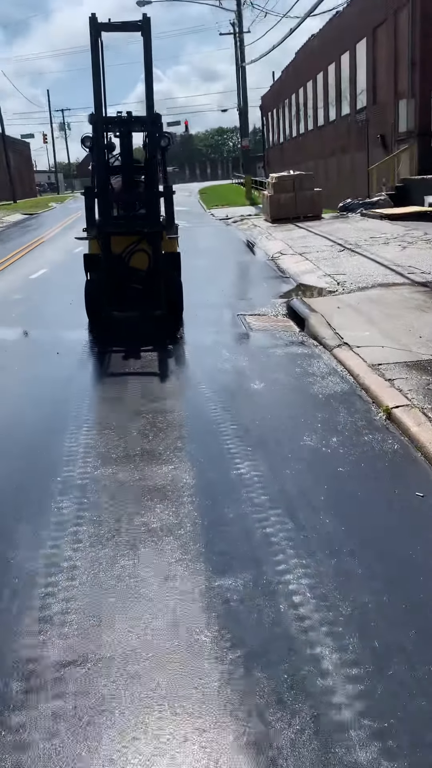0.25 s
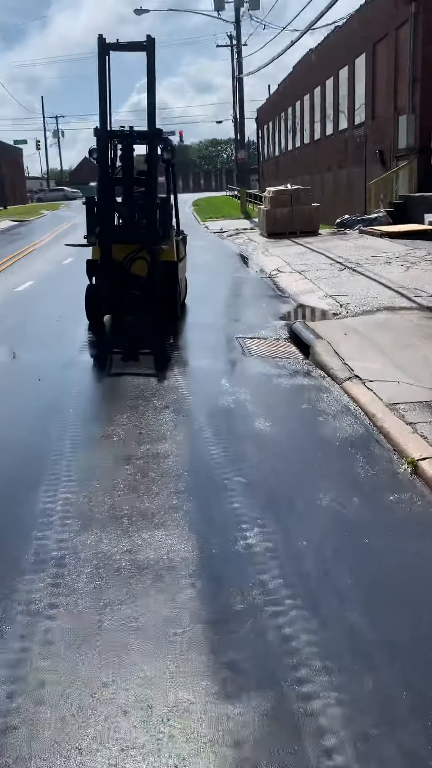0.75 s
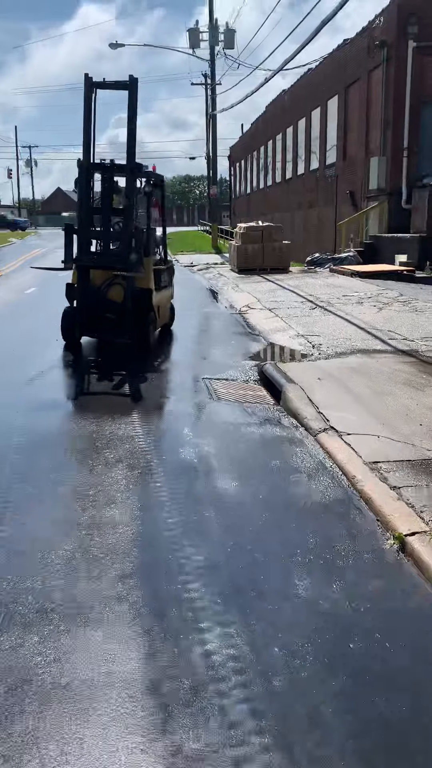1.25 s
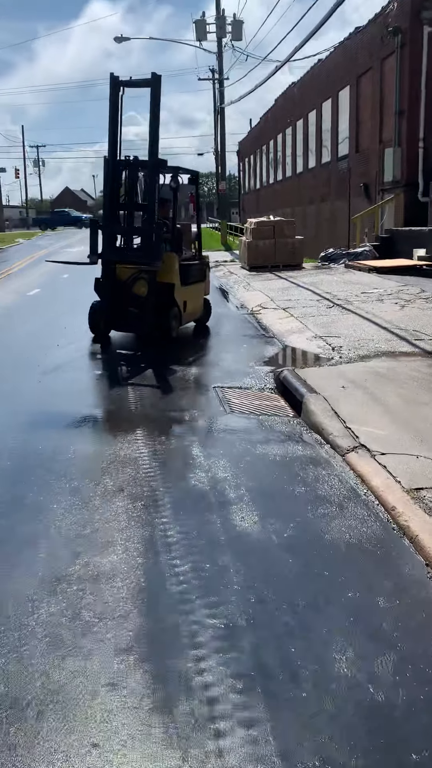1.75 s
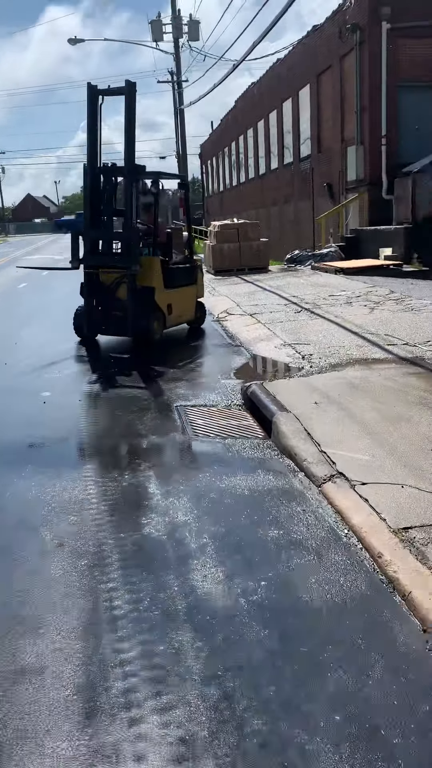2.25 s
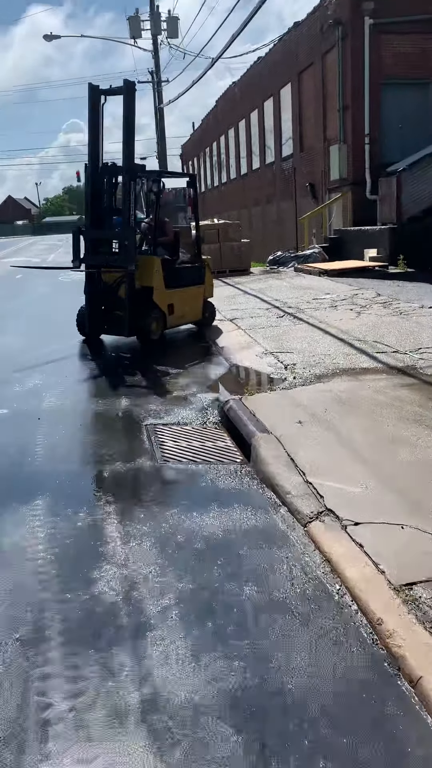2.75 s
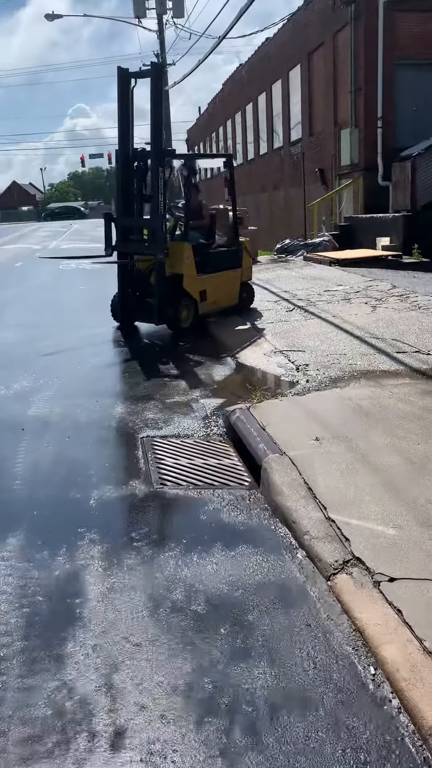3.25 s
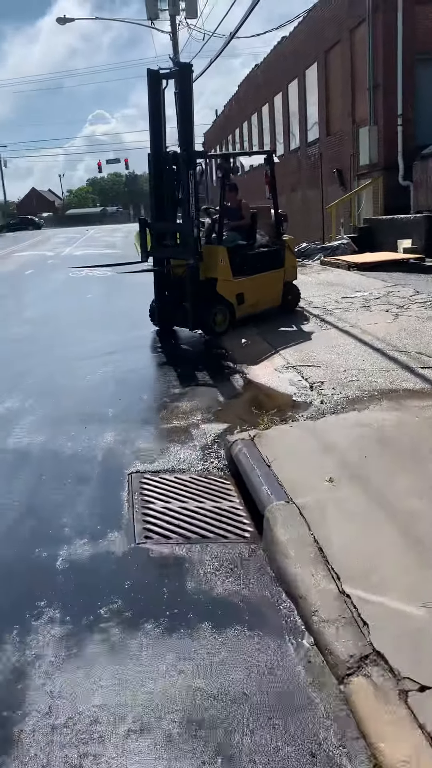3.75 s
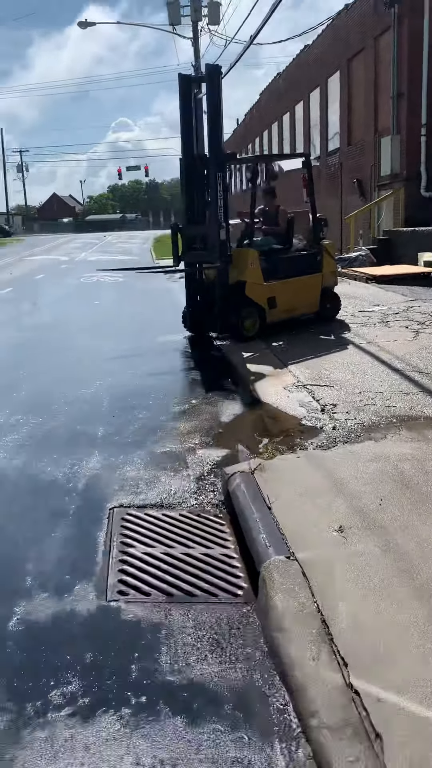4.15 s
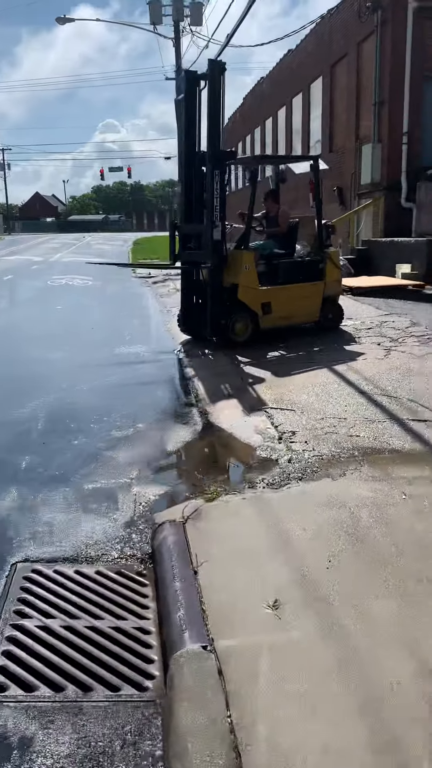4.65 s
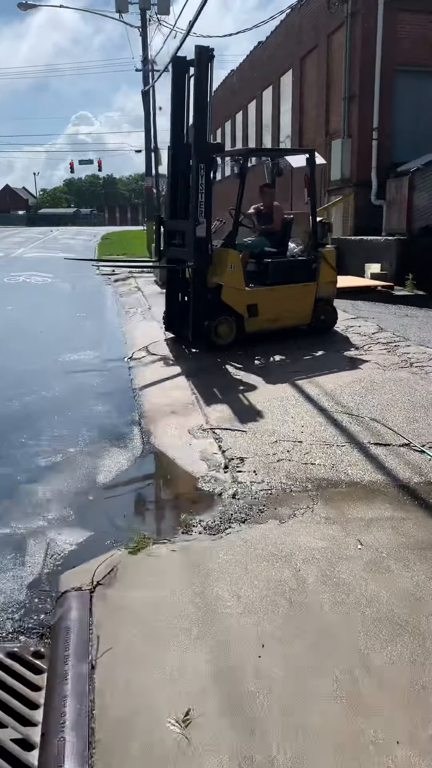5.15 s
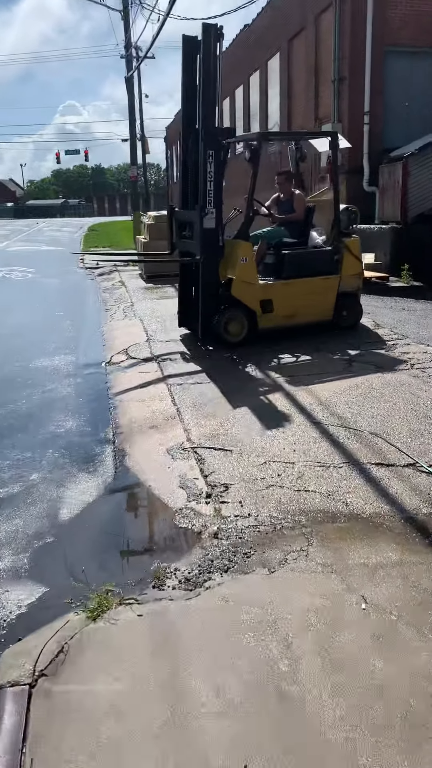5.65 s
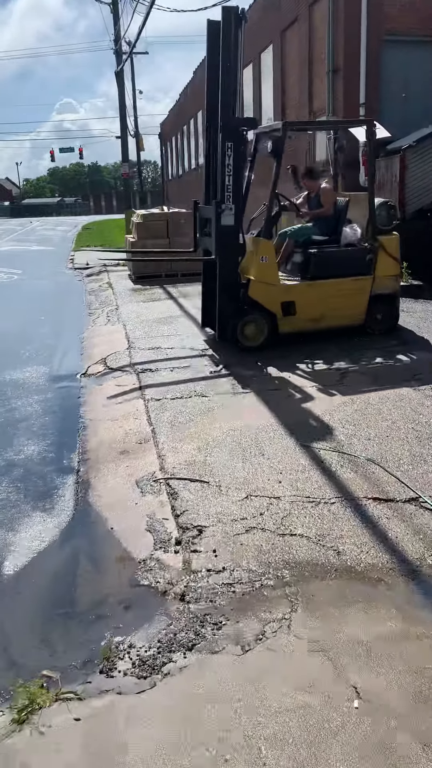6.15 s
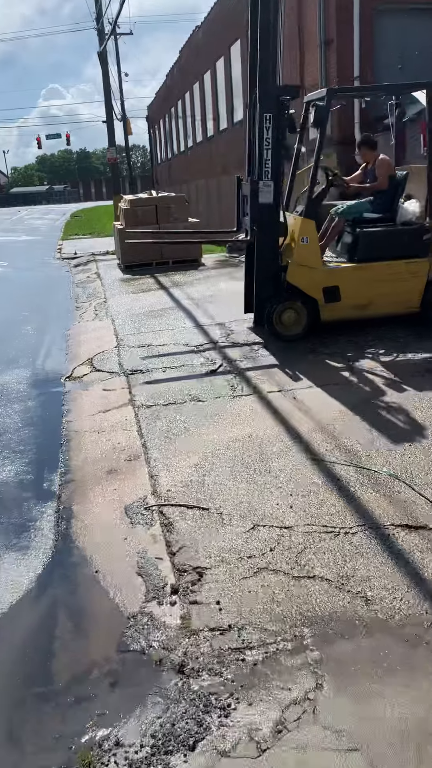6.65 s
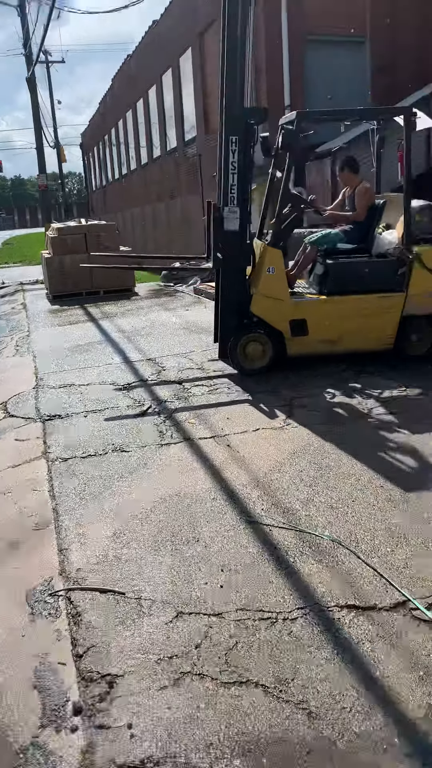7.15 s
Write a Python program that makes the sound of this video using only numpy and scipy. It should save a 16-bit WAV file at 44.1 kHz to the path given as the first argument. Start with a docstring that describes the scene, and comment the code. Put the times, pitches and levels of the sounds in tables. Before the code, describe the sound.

A forklift's engine chugs low and uneven outdoors, its pitch dropping as it slows with a falling gear whine and wet tyre swishes. Mast rails chatter. Crossing onto cracked concrete, the forks clank and crunch while the engine revs, dips and revs again; the loudest knock comes late, before a closing metallic squeal. A handheld stereo microphone hears a short echo from the yard.

```python
"""A propane forklift engine lopes at idle and chugs unevenly under throttle too: puffs and tones ring its pipe.
The truck turns off a wet street onto cracked concrete; shaped noise makes its hiss and running gear.
Gear tones whine lower as it slows, and tyres swish with noise and bursting grains.
The mast chatters and squeaks with wavering tones; the forks clank with ringing steel, thuds and crunches."""
import sys
import numpy as np
from scipy import signal
from scipy.fft import rfft, irfft, next_fast_len
from scipy.io import wavfile
from scipy.ndimage import uniform_filter1d, map_coordinates

SR = 44100
rng = np.random.default_rng(int(sys.argv[2]) if len(sys.argv) > 2 else 0)


def transcribe(u):
    """Save the signal u as a 16-bit wav file named by the first command-line argument.

    u: samples, shape (n,) or (channels, n), limited to [-1, 1]; the rate is SR.
    q: integer samples, one column per channel.
    """
    v = np.clip(np.atleast_2d(u).T, -1, 1)
    q = np.round(v * 32767).astype(np.int16)
    wavfile.write(sys.argv[1], SR, q)


N = 326340
T = np.arange(N) / SR
# Levels in the tables are relative: later gains and filters shift them.


def amp(db):
    """Turn decibels into a gain."""
    return 10 ** (np.asarray(db) / 20)


def unit(x):
    """Scale to an rms (average strength) of 1."""
    return x / np.sqrt(np.mean(x ** 2) + 1e-20)


def steady(x):
    """Even out the loudness by dividing by a running rms."""
    window = SR // 7
    power = uniform_filter1d(uniform_filter1d(x ** 2, size=window), size=window)
    return x / np.sqrt(np.abs(power) + 1e-20)


def along(points, hz):
    """Read a curve of (frequency [Hz], value) points on a log frequency axis."""
    f, v = np.transpose(points)
    return np.interp(np.log(hz + 1), np.log(f + 1), v)


def curves(rows):
    """Draw each column after the time as a curve with one value per sample."""
    s, *cols = np.transpose(rows)
    return [np.interp(T, s, c) for c in cols]


def wobble(rate):
    """A smooth random curve with rate knots a second."""
    knots = rng.standard_normal(int(N * rate / SR) + 4)
    return map_coordinates(knots, [T * rate])


def wavering(hz, share, rate):
    """Phase of a tone whose pitch wavers by a share of itself, with rate knots a second."""
    return 2 * np.pi * np.cumsum(hz * (1 + share * wobble(rate))) / SR


def filtered(x, response):
    """Multiply the spectrum of x by a response to frequency."""
    m = next_fast_len(N + SR // 2)
    return irfft(rfft(x, m) * response(np.fft.rfftfreq(m, 1 / SR)), m)[..., :N]


def noise(spectrum):
    """Coloured noise of rms 1."""
    return unit(filtered(rng.standard_normal(N), lambda hz: amp(along(spectrum, hz))))


def causal(spectrum, size=8192):
    """Turn a spectrum into a minimum-phase impulse response, which answers as early as it can."""
    log_gain = np.log(amp(along(spectrum, np.fft.rfftfreq(size, 1 / SR))))
    cepstrum = irfft(log_gain)
    cepstrum[1:size // 2] *= 2
    cepstrum[size // 2 + 1:] = 0
    return irfft(np.exp(rfft(cepstrum)))


def add(track, s, sound):
    """Mix a sound in at time s."""
    start = max(round(s * SR), 0)
    track[start:start + len(sound)] += sound[:N - start]


def ring(modes, t, detune):
    """Steel rings at several fading pitches, struck a little differently each time."""
    total = 0
    for hz, db, t60 in modes:
        gain = amp(db + rng.normal(0, 2) - 60 * t / t60)
        pitch = hz * (1 + detune * rng.normal())
        total = total + gain * np.sin(2 * np.pi * (pitch * t + rng.random()))
    return total


# engine speed: (time [s], firing rate [firings per second])
ENGINE_SPEED = [(0.0, 43.68), (0.25, 43.09), (0.75, 36.5), (1.3, 33.38), (2.0, 31.77), (3.3, 30.95),
                (3.7, 33.12), (4.05, 37.52), (4.5, 39.37), (4.85, 37.83), (5.15, 30.54), (5.35, 30.66),
                (5.62, 32.63), (6.05, 41.88), (6.3, 43.6), (6.6, 33.01), (6.95, 28.93), (7.4, 27.27)]


def firing_rate():
    """How often a cylinder fires, as the engine speeds up and slows down."""
    return curves(ENGINE_SPEED)[0]


def firings(turns):
    """The samples at which a cylinder fires: each time the firing count passes a whole number."""
    return np.flatnonzero(np.diff(np.floor(turns)) > 0)


# the driver's foot: (time [s], exhaust level [dB], throttle [0-1])
DRIVER_FOOT = [(0, -27, 0.69), (.4, -28.5, 0.7), (.9, -34.5, 0.57), (1.4, -31.5, 0.27), (3, -31, 0.2),
               (3.8, -30.5, 0.61), (4.5, -28.5, 0.63), (5.1, -33, 0.53), (5.4, -30, 0.55),
               (5.72, -27.5, 0.75), (6.35, -32, 0.97), (6.62, -34.5, 0.6), (6.76, -28, 0.29),
               (7.4, -31, 0.81)]
# firing orders 1 to 6: (level with throttle shut [dB], level with it open [dB])
ORDER_LEVELS = [(-11, 4), (-24.5, 3.5), (-16, 13), (6, 6), (11, -6.5), (-1, -6.5)]
# the silencer's peaks and dips, which the orders sweep through: (frequency [Hz], level [dB])
SILENCER_RESPONSE = [(28, -17), (33, -7), (42, -0.5), (60, 8.5), (70, 7), (78, -5.5), (90, 1.5), (115, 0.5),
                     (135, -7), (165, -10), (205, 4), (280, -3.5)]
# how the pipe colours the puffs: (frequency [Hz], level [dB])
PIPE_RESPONSE = [(25, -40), (55, 0.5), (90, -5), (130, 2.5), (180, 1), (240, -2.5), (310, -11.5),
                 (450, -21), (1200, -70)]
# flow noise in the pipe: (level with throttle shut [dB], level with it open [dB])
FLOW_NOISE = (-34, -31)
# open throttle advances the orders: (even orders [radians], odd orders [radians])
LOAD_LEAD = (1.7, 3.4)
# two rows, throttle shut then open: (puff of each of four cylinders less the average [relative size])
CYLINDER_PUFFS = [(-.25, .6, -.9, .55), (0, .6, -.95, .35)]
# loudness of the uneven puffs: (time [s], level [dB])
LOPE_LEVEL = [(.25, -30.5), (.55, -39), (1, -36), (1.4, -32), (3.7, -30), (5.1, -33), (6.15, -28),
              (6.55, -33), (6.75, -30)]
BARK_DB = -12  # orders above the sixth, against the third
CRANK_JITTER, ORDER_DRIFT_DB = .008, 1.3  # in firing intervals; slow swell of each order
PUFF_SCATTER = .19  # random part of each puff, relative size
DULL_HZ, DULL_FROM_S, DULL_TO_S = 190, 5.8, 6.9  # the puffs lose their top as the tailpipe turns away


def exhaust(rate, turns):
    """Puffs ring the pipe: even firing gives the orders, unequal cylinders the lope; throttle sets their mix."""
    level_db, throttle = curves(DRIVER_FOOT)
    by_throttle = lambda shut, wide: shut + (wide - shut) * np.clip(throttle, 0, 1)
    response = causal(PIPE_RESPONSE)
    lag = np.unwrap(np.angle(rfft(response)))
    grid = np.fft.rfftfreq(len(response), 1 / SR)

    order_db = []
    for k, (shut_db, wide_db) in enumerate(ORDER_LEVELS, 1):
        order_db.append(level_db + by_throttle(shut_db, wide_db) + along(SILENCER_RESPONSE, k * rate))
    # load, which drives the third order, also brings out a bark above the sixth
    order_db += [order_db[2] + BARK_DB + 0.58 * along(PIPE_RESPONSE, k * rate) for k in range(7, 11)]

    turns = turns + CRANK_JITTER * wobble(25)  # the crank runs a little unevenly
    tone = np.zeros(N)
    for k, db in enumerate(order_db, 1):
        pipe_lag = np.interp(k * rate, grid, lag)
        phase = 2 * np.pi * k * turns + pipe_lag + throttle * LOAD_LEAD[k % 2]
        tone += amp(db + ORDER_DRIFT_DB * wobble(1.996)) * np.sqrt(2) * np.cos(phase)

    at = firings(turns)
    shut, wide = (np.resize(sizes, len(at)) for sizes in CYLINDER_PUFFS)
    openness = np.clip(2 * throttle[at], 0, 1)
    puffs = np.zeros(N)
    puffs[at] = shut + (wide - shut) * openness + PUFF_SCATTER * rng.standard_normal(len(at))
    # coasting leaves the puffs distinct; under throttle more turbulent flow joins them
    puffs += amp(by_throttle(*FLOW_NOISE)) * rng.standard_normal(N)

    bright = signal.fftconvolve(puffs, response)[:N]
    dull = filtered(bright, lambda hz: 1 / (1 + (hz / DULL_HZ) ** 4))
    turned_away = np.interp(T, [DULL_FROM_S, DULL_TO_S], [0, 1])
    lope_db, = curves(LOPE_LEVEL)
    lope = amp(lope_db) * steady(bright + turned_away * (dull - bright))
    return -(tone + lope)


def rattle(gear_db):
    """Loose rails ring under random taps, harder as the truck shakes."""
    taps = (rng.random(N) < 260 / SR) * rng.standard_normal(N)  # about 260 a second
    rails = [(1072, 81, 6.0), (1470, 350, -1.0)]  # (pitch [Hz], width before squaring [Hz], level [dB])

    def resonance(f):
        return sum(amp(db) * (1j * f * w / (c * c - f * f + 1j * f * w)) ** 2 for c, w, db in rails)

    shaking_db = gear_db - 14.0 + 0.29 * (gear_db - gear_db.mean())
    return unit(filtered(taps, resonance)) * amp(shaking_db)


def grit(centre_hz, t60_s, count=3000, scatter_db=3.0):
    """Grains burst under the tyres as short fading tones, each with its own pitch and size."""
    start = rng.integers(0, N, (count, 1))
    pitch, size = rng.standard_normal((2, count, 1))
    t = T[:SR // 50]  # every grain is cut off after 20 ms
    gain = amp(scatter_db * np.minimum(size, 2) - 60 * t / t60_s)
    grains = gain * np.sin(2 * np.pi * centre_hz * np.exp(.35 * pitch) * t)
    places = start + np.arange(len(t))
    return unit(np.bincount(places.ravel(), grains.ravel(), N)[:N])


# rolling noise as the ground changes and the truck nears: (time [s], running gear level [dB], hiss level [dB])
ROLLING_NOISE = [(0, -35, -41.5), (2.85, -36.5, -49), (3.35, -31, -45.5), (4, -34.5, -39),
                 (5.55, -34.5, -42), (5.85, -31, -34), (6.6, -32.5, -40), (6.9, -33.5, -48.5),
                 (7.4, -34.5, -49.5)]
# colour of the running gear: (frequency [Hz], level [dB])
GEAR_COLOUR = [(120, -19), (310, 6.5), (480, -2), (780, .5), (1200, -5.5), (1550, -6.5), (2100, -9.5),
               (3400, -14), (16000, -35.5)]
# colour of the hiss, broad and bright with dips near 4900 and 7500 Hz: (frequency [Hz], level [dB])
HISS_COLOUR = [(1500, -9), (3000, -0.5), (4100, -4), (4900, -3), (6100, 6), (7500, -3.5), (10700, 1),
               (12500, -3.5), (15500, -6.5)]
BASE_HZ, GEAR_DB_PER_HZ, HISS_DB_PER_HZ = 35.1, 0.2734, 0.03  # both grow with the firing rate
RASP_DB = 1.6  # the running gear swells with each firing
STONES_DB = -10  # against the hiss


def machinery(rate, turns):
    """Running gear and fan and intake hiss pulse with the firings; wet grit crackles and small stones crack."""
    gear_db, hiss_db = curves(ROLLING_NOISE)
    gear_db = gear_db + GEAR_DB_PER_HZ * (rate - BASE_HZ)
    hiss_db = hiss_db + HISS_DB_PER_HZ * (rate - BASE_HZ)
    beat = np.cos(2 * np.pi * (turns - .2))
    gear = unit(noise(GEAR_COLOUR) * amp(RASP_DB * beat + wobble(45))) * amp(gear_db - 1.4)
    hiss = unit(noise(HISS_COLOUR) * amp(1.65 * beat + 0.73 * wobble(70))) * amp(hiss_db + 0.1)
    crackle = grit(centre_hz=6994, t60_s=0.19) * amp(hiss_db - 3.0 + 0.21 * beat)
    stones = grit(centre_hz=8000, t60_s=.006, count=330, scatter_db=4.5) * amp(hiss_db + STONES_DB)
    return gear + hiss + crackle + stones + rattle(gear_db)


# gear whine: (time [s], pitch [Hz], level [dB])
GEAR_WHINE = [(0, 965, -40), (.3, 947, -41.5), (.55, 915, -43), (1.05, 830, -50), (1.32, 783, -40.5),
              (1.7, 748, -41.5), (2.2, 722, -43.5), (3, 680, -68)]
# a lower whine that falls and dies as the engine slows: (time [s], pitch [Hz], level [dB])
LOWER_WHINE = [(0, 660, -43.5), (.22, 642, -44), (.8, 500, -70), (1, 500, -120)]


def whine():
    """The drive gears sing lower as the truck slows: two gliding, wavering tones, one with an overtone."""
    hz, db = curves(GEAR_WHINE)
    low_hz, low_db = curves(LOWER_WHINE)
    phase, low_phase = (wavering(pitch, .0045, 60) for pitch in (hz, low_hz))
    high = amp(db) * (np.sin(phase) + .2 * np.sin(2 * phase))
    low = amp(low_db) * np.sin(low_phase)
    return 1.2 * amp(1.5 * wobble(45)) * (high + low)


# tyres swish on the wet road: (time [s], nominal length [s], level [dB])
TYRE_SWISHES = [(0.247, 0.16, -36), (2.395, 0.19, -38), (3.137, 0.18, -41)]
# colour of the splashing water: (frequency [Hz], level [dB])
SPRAY_COLOUR = [(400, -20), (1200, -1), (2000, 3), (4000, 0.5), (6500, 2), (15000, -19)]


def tyres():
    """Water sizzles until the tyres leave the street; each swish starts quickly and thins to a faint spray."""
    level = np.zeros(N)
    for s, length, db in TYRE_SWISHES:
        # the last, faint value holds to the end
        level += amp(db) * np.interp((T - s) / length, [0, .25, .7, 1.25], [0, 0.82, 0.72, 0.086])
    spray = amp(1.5 * wobble(60)) * noise(SPRAY_COLOUR)
    splash = level * (spray + 1.1 * grit(centre_hz=3000, t60_s=.012))
    wet_db = np.interp(T, [1.8, 3, 4], [-53, -56, -70])
    sizzle = amp(wet_db) * noise([(5000, -20), (10000, 0), (15500, -3)]) * amp(wobble(70))
    return splash + sizzle


# bouts of mast taps: (time [s], length [s], pitch [Hz], level [dB], every second tap against it [dB])
MAST_BOUTS = [(.72, .46, 1080, -36, -3), (1.6, .62, 1085, -35, -14), (2.7, .28, 1080, -36.5, -4),
              (5.72, .72, 1560, -30.5, -4)]
TAP_T60_S, TAP_DETUNE, TAP_SCATTER_DB = .075, .028, 1.2  # fade, pitch scatter as a share, level scatter


def chatter(turns):
    """During a bout each firing knocks the mast rails together lightly, harder once a revolution."""
    out, t = np.zeros(N), T[:SR // 4]
    soft_start = 1 - np.exp(-t / .005)
    beats = T[firings(turns)]
    for start, length, hz, db, offbeat_db in MAST_BOUTS:
        for k in np.flatnonzero((beats >= start) & (beats < start + length)):
            tap_db = db + (0 if k % 2 else offbeat_db) + TAP_SCATTER_DB * rng.normal()
            tap = ring([(hz, tap_db + 3, TAP_T60_S)], t, TAP_DETUNE)
            add(out, beats[k], tap * soft_start)
    return out


# the mast rails bind and squeak: (time [s], length [s], pitch [Hz], level [dB])
SHORT_SQUEAKS = [(3.025, .06, 1105, -31), (3.715, .04, 1110, -28.5), (3.78, .03, 1010, -32),
                 (4.22, .025, 1015, -31), (4.67, .03, 1075, -32), (5.135, .03, 1085, -30.5),
                 (5.205, .03, 1090, -34), (5.267, .028, 1080, -34), (5.332, .03, 1075, -33),
                 (5.38, .04, 1082, -30)]
# the long closing squeal swells and stops: (time [s], pitch [Hz], level [dB])
CLOSING_SQUEAL = [(7.07, 1040, -120), (7.1, 1035, -35), (7.3, 1060, -27.5), (7.365, 1045, -31),
                  (7.4, 1045, -50)]
SQUEAK_WAVER, SQUEAL_WAVER = .028, .035  # pitch scatter, as a share


def squeaks(rate):
    """Steel slips on steel: short rough squeaks, then a long squeal that throbs with the engine's shaking."""
    short = np.zeros(N)
    for s, length, hz, db in SHORT_SQUEAKS:
        swell = np.sin(np.pi * np.clip((T - s) / length, 0, 1))
        short += amp(db) * swell * np.sin(wavering(hz, SQUEAK_WAVER, 250))
    hz, db = curves(CLOSING_SQUEAL)
    throb_db = 2 * np.cos(2 * np.pi * np.cumsum(rate) / SR) + 2.5 * wobble(140)
    return short + amp(db + throb_db - 1.5) * np.sin(wavering(hz, SQUEAL_WAVER, 200))


# ringing pitches of the steel forks: (pitch [Hz], level [dB], time to fade by 60 dB [s])
FORK_MODES = [(406, 0.5, 0.17), (659, 2, 0.17), (871, -3, 0.42), (1263, -1.5, 0.072), (1601, -3, 0.1)]


def fork_ring(t, detune):
    """The steel forks ring when struck, each pitch fading at its own pace."""
    return .13 * ring(FORK_MODES, t, detune)


CRUNCH_OCTAVES, CRUNCH_T60_S = .6, .085  # spread of the band, fade


def crunch(centre_hz, t):
    """A short burst of noise around one pitch, as steel grinds on steel."""
    octaves = np.log2((np.fft.rfftfreq(len(t), 1 / SR) + 1) / centre_hz)
    bell = np.exp(-.5 * (octaves / CRUNCH_OCTAVES) ** 2)
    band = irfft(rfft(rng.standard_normal(len(t))) * bell, len(t))
    return unit(band) * amp(-60 * t / CRUNCH_T60_S)


# stretches of cracked concrete: (start time [s], end time [s], mean level [dB])
CRACKED_CONCRETE = [(3.25, 4.8, -31.5), (5.75, 6.5, -27.5)]
JOLTS_PER_S, JOLT_SCATTER_DB = 30, 3


def jolts():
    """Rough ground jolts the forks at random, so they clink and grind between the big knocks."""
    out, t = np.zeros(N), T[:SR // 6]
    soft_start = 1 - np.exp(-t / .001)
    for start, end, db in CRACKED_CONCRETE:
        for s in rng.uniform(start, end, round((end - start) * JOLTS_PER_S)):
            clink = fork_ring(t, detune=.08) + .5 * crunch(800 * 2 ** rng.uniform(-1, 1), t)
            add(out, s, amp(db + JOLT_SCATTER_DB * rng.normal()) * clink * soft_start)
    return out


# big fork and carriage knocks:
# (time [s], level [dB], thud level [dB], crunch level [dB], crunch centre [Hz])
FORK_KNOCKS = [(3.34, -24, -10, -1, 1500), (3.395, -22, -10, -2, 900), (3.664, -26, -1, -6, 700),
               (3.82, -21, -4, -3, 800), (4.239, -27, -12, 11, 1900), (4.609, -32, -8, 10, 3400),
               (4.718, -22, -4, 1, 1200), (6.268, -15, -7, 2, 850), (6.352, -26, -8, 3, 1600),
               (6.416, -20.5, -5, -2, 1100)]


def clanks():
    """Forks knock in the carriage over the joints: ringing steel with a low thud and a crunch."""
    out, t = np.zeros(N), T[:SR // 4]
    soft_start = 1 - np.exp(-t / 0.00089)
    thud = noise([(100, -4), (280, -4.0), (450, -3.0), (900, -15), (3000, -60)])
    for s, db, thud_db, crunch_db, crunch_hz in FORK_KNOCKS:
        here = slice(round(s * SR), round(s * SR) + len(t))
        knock = fork_ring(t, detune=0.013)
        knock += 0.63 * amp(thud_db) * thud[here] * amp(-60 * t / 0.24)
        knock += .25 * amp(crunch_db) * crunch(crunch_hz, t)
        add(out, s, amp(db + 4.5) * knock * soft_start)
    return out


# how long the yard echoes: (frequency [Hz], time to fade by 60 dB [s])
YARD_FADE = [(200, 0.64), (2000, 0.26), (10000, 0.25)]


def yard(x):
    """Walls and pavement scatter the sound: a fading noise tail, different on each side."""
    hz, t, z = signal.stft(rng.standard_normal((2, SR // 2)), SR, nperseg=256)
    fade = amp(-60 * t / along(YARD_FADE, hz)[:, None])
    tail = signal.istft(z * fade, SR, nperseg=256)[1]
    wet = signal.fftconvolve(x[None], tail / np.linalg.norm(tail[0]), axes=1)[:, :N]
    colour = [(150, -25.0), (300, -11.5), (600, -6.0), (2000, -5.5), (7000, -74)]  # (frequency [Hz], level [dB])
    return filtered(wet, lambda f: amp(along(colour, f)))


def scene():
    """The truck in its yard, with the exhaust leaning right."""
    rate = firing_rate()
    turns = np.cumsum(rate) / SR - .72  # running count of firings
    pipe = exhaust(rate, turns)
    rest = machinery(rate, turns) + whine() + tyres() + chatter(turns) + squeaks(rate) + jolts() + clanks()
    left_right = amp([[-1], [.9]])
    return pipe * left_right + amp(0.88) * rest + yard(pipe + rest)


# phase between the two microphone ports: (frequency [Hz], lead of left over right [radians])
PORT_LEAD = [(0, 0), (1000, 0), (1350, -.6), (2400, 1.5), (3600, 1.5), (4600, 3.1), (15400, 18.85)]
TOP_HZ = 15900  # band limit


def record(dry):
    """The two microphone ports differ in phase; nothing passes from the band limit up."""
    lead = lambda hz: np.interp(hz, *np.transpose(PORT_LEAD))
    return filtered(dry, lambda hz: np.exp(.5j * np.outer([1, -1], lead(hz))) * (hz < TOP_HZ))


dry = scene()
out = record(dry)
transcribe(out)
```